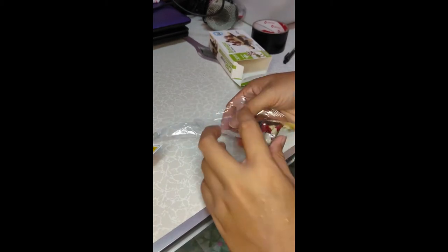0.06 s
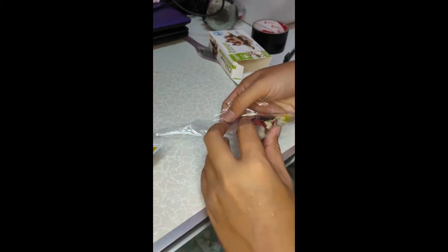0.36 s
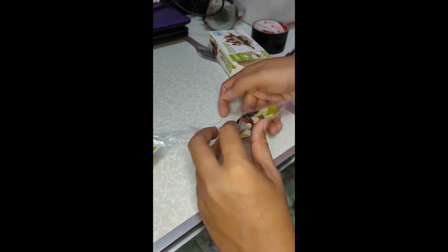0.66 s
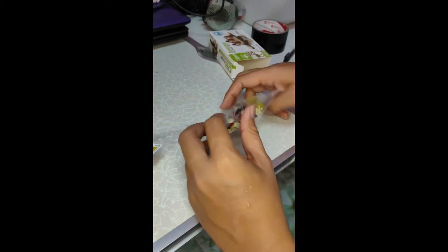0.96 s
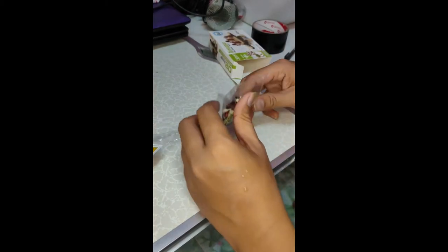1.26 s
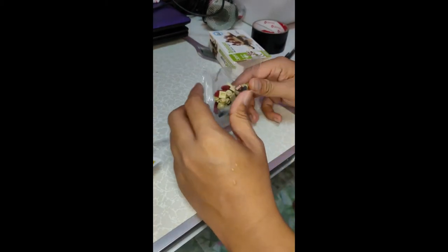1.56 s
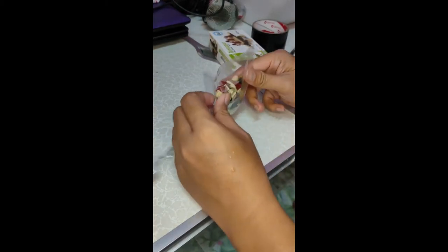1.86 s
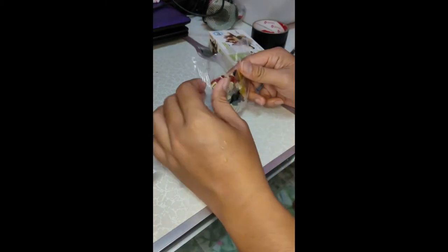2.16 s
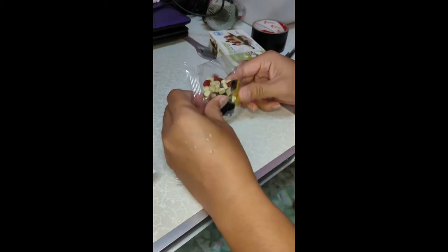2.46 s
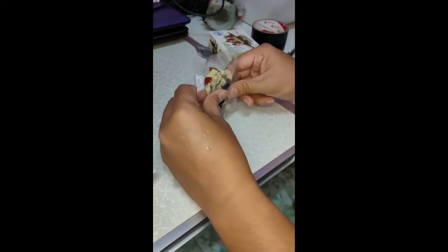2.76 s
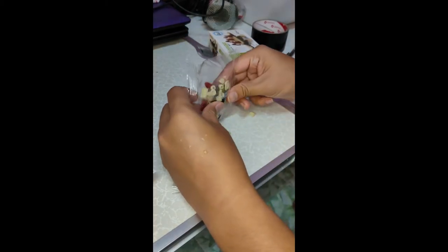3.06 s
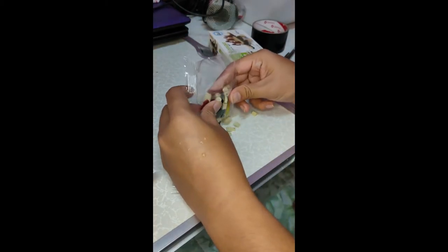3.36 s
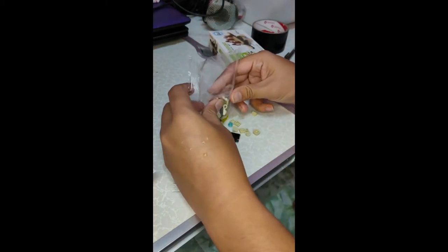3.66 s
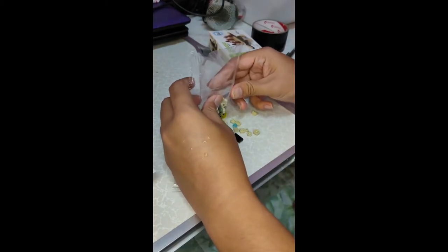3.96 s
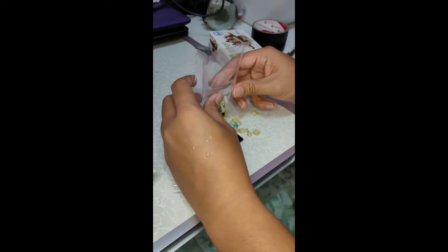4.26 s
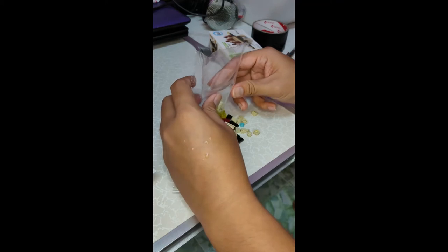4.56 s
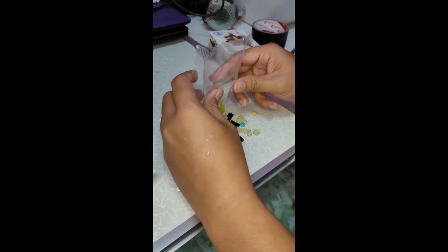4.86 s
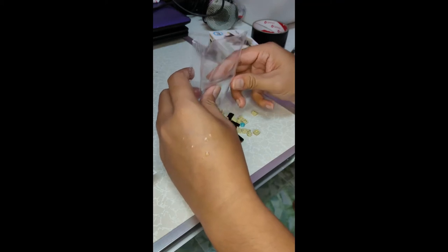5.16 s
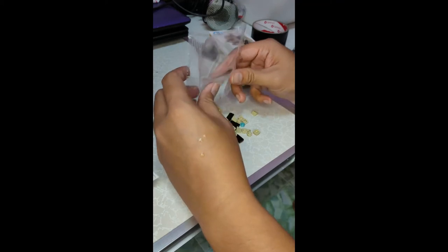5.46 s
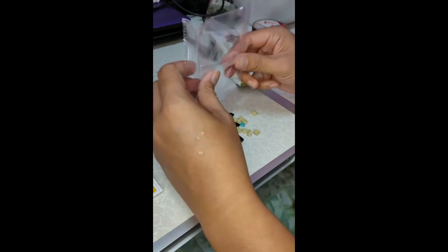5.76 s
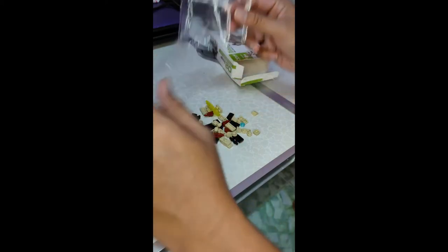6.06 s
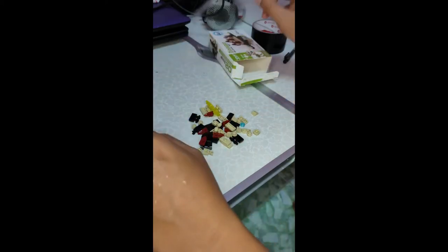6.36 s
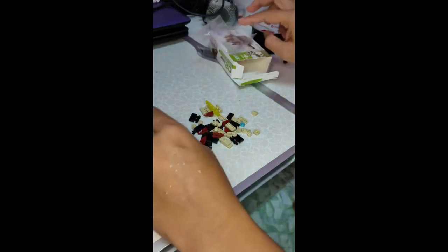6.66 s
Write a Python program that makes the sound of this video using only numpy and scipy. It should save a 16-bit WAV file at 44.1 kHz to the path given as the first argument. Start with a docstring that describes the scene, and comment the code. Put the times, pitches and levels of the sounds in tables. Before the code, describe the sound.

A thin plastic bag is handled close to a phone microphone in a hard-walled room with a short echo. For the first two seconds it crinkles in light spurts, with sharp, bright snaps and faint low nudges on the table. At about 2.3 seconds come a tiny finger squeak and a soft bump, and the shaking starts: louder, denser rustling, with the sharpest cracks around 2.6 and 2.8 seconds. Small plastic toy bricks jostle in the bag and clack against each other and the table until about 4.7 seconds, with a hollow bump near 3.4 and a brief lull just after 4. From 5 to 6 seconds the emptied bag crinkles and snaps more softly. A last crinkle, a click and a hollow table thud land at about 6.5 seconds. A fan hums quietly throughout, its drone sinking after one second and swelling back around 3.5.

```python
"""A thin plastic bag snaps and crinkles close by as hands work it open and shake out small toy bricks.
Creases flip with bright cracks over a rustle of tiny pops; the bricks jostle in the film and clack
against each other and the table. A finger squeaks on the plastic, and the hands bump down.
Behind it all a fan hums in the hard-walled room. A phone hears the scene through two microphone
ports, each ringing near 7 kHz."""
import sys
import numpy as np
from scipy import signal
from scipy.fft import rfft, irfft, next_fast_len
from scipy.io import wavfile
from scipy.ndimage import map_coordinates

SR = 44100
rng = np.random.default_rng(int(sys.argv[2]) if len(sys.argv) > 2 else 0)


def output_pcm(signal):
    """Save a mono or channel-first signal as 16-bit PCM at the path in sys.argv[1].

    Samples are clipped to [-1, 1] before scaling.
    """
    pcm = np.clip(np.atleast_2d(signal).T, -1, 1) * 32767
    wavfile.write(sys.argv[1], SR, np.round(pcm).astype(np.int16))


N = 295470

# The body colour of the bricks. Each row, as in every colour table: frequency in Hz, relative level in dB.
BRICK_COLOUR = [(200, -1.5), (450, 6.5), (1000, 4.5), (2500, 0), (4000, -4.5), (8000, -22.5), (16000, -40)]


def hands(grip_rise_s=0.01, grip_bricks_db=-3, empty_at_s=5):
    """Two level curves in dB: how hard the hands crumple the film and how hard they stir the bricks."""
    # Fingers pinch and pull the film. Each row: start in seconds, length in seconds, level in dB.
    grips = [(-0.02, 0.021, -44), (0.244, .03, -55), (0.281, 0.045, -48), (0.445, 0.059, -46.5),
             (0.666, 0.17, -52.5), (0.866, 0.048, -53.5), (0.91, 0.064, -51), (1.233, 0.065, -50.5),
             (1.666, 0.055, -47.5), (1.782, 0.033, -46.5), (2.1, 0.12, -51.5), (5.076, 0.016, -44.5),
             (5.14, .06, -48.5), (5.21, 0.037, -43), (5.302, 0.08, -52), (5.661, 0.19, -53),
             (5.91, 0.081, -59), (6.432, 0.044, -51), (6.485, 0.02, -46)]
    # The bag is shaken. Each row: start, rise and length in seconds, film level and brick level in dB.
    shakes = [(2.318, 0.021, 0.12, -39, -44), (2.563, 0.053, 0.12, -37, -44),
              (2.737, 0.029, .3, -35, -42.5), (2.99, 0.13, 0.31, -42.5, -47), (3.299, 0.018, 0.1, -37, -48),
              (3.37, 0.071, 0.434, -33.5, -39.5), (3.82, 0.03, 0.22, -38.5, -47),
              (4.06, 0.056, 0.13, -53.5, -63), (4.217, 0.013, 0.074, -40, -45.5),
              (4.248, 0.083, 0.46, -35, -41)]
    film = [(s, grip_rise_s, length, db) for s, length, db in grips]
    bricks = [(s, grip_rise_s, length, db + grip_bricks_db) for s, length, db in grips if s < empty_at_s]
    for s, rise, length, film_db, bricks_db in shakes:
        film.append((s, rise, length, film_db))
        bricks.append((s, rise, length, bricks_db))
    # the bricks settle sooner than the film, and the held bag is never quite still
    return effort(film, sag_db_per_s=25, held_db=-71.5), effort(bricks, sag_db_per_s=45, held_db=-61.5)


def effort(moves, sag_db_per_s, held_db, release_db_per_s=180):
    """The level in dB of a run of hand moves: each rises, slackens while it lasts and is then let go."""
    t = np.arange(0, N / SR, .002)
    power = amp(held_db) ** 2
    for s, rise, length, db in moves:
        sag_db = sag_db_per_s * np.maximum(t - s - rise, 0)
        release_db = release_db_per_s * np.maximum(t - s - length, 0)
        attack = np.clip((t - s) / rise, 0, 1)
        power = power + (attack * amp(db - sag_db - release_db)) ** 2
    return np.interp(np.arange(N) / SR, t, 10 * np.log10(power))


def snaps(work_db, edge_db=6, sheet_db=-14.5, sheet_growth=0.27):
    """Each crease cracks brightly, and the sheet around it gives a duller pop that varies less."""
    # The loudest creases. Each row: start in seconds, level in dB, left minus right in dB.
    accents = [(0.251, -47, -4), (0.3042, -38, -1), (0.4234, -33.5, 4), (0.457, -21, -2),
               (0.6594, -40.5, -11), (0.963, -30.5, -3), (1.0152, -28, -2), (1.2343, -32.5, -2),
               (1.278, -35, 2), (1.3188, -39, -1), (1.4985, -27, -2), (1.7035, -32, -4), (1.8028, -26, -3),
               (1.8145, -32, 0), (1.8272, -29, -8), (1.8493, -21.5, 4), (1.8605, -27, -1),
               (2.0942, -33.5, -3), (2.139, -36.5, -10), (2.1768, -32, -4), (2.387, -23.5, -5),
               (2.474, -27.5, -3), (2.4948, -20.5, -1), (2.5883, -16, 3), (2.7593, -16, -6),
               (3.0812, -24, -2), (3.8472, -26, 3), (4.118, -32.5, 0), (4.638, -26, -4), (5.0833, -36, 0),
               (5.1517, -32, 0), (5.2283, -27.5, 1), (5.4245, -32, -5), (5.5236, -38, -3),
               (5.6815, -28.5, -2), (5.9315, -32.5, -6), (5.9612, -32.5, -1), (5.9925, -34.5, 0),
               (6.1135, -42, -10)]
    # The colours of the crack and of the sheet. Each row: frequency in Hz, level in dB.
    crack_colour = [(200, -20), (1000, -23), (2700, 5), (5000, 0.5), (7200, 4.5), (10000, 3.5),
                    (13000, 5.5), (16000, 0.5)]
    sheet_colour = [(60, 16), (170, 1), (400, -11), (1500, 6.5), (2700, -1.5), (6000, -11.5), (16000, -43)]
    edge, sheet = np.zeros((2, 2, N))
    for s, db, pan_db in list(accents) + stray_creases(work_db):
        sides = amp(np.array([[pan_db], [-pan_db]]) / 2)
        t60 = np.interp(db, [-30, -18], [.003, .0007])  # the harder the flip, the shorter the crack
        add(edge, s, amp(db + edge_db) * sides * crack(t60))
        add(sheet, s + 0.000942, amp(sheet_db + sheet_growth * db) * burst(0.042))
    return coloured(edge, crack_colour) + coloured(sheet, sheet_colour)


def stray_creases(work_db, per_s=14, count=200, base_db=-9.5, growth=0.57):
    """Cues for lesser creases that give way at random, louder when the film is worked harder."""
    times = np.cumsum(rng.exponential(size=count)) / per_s
    creases = []
    for s, (size, side) in zip(times, rng.standard_normal((count, 2))):
        if s * SR < N:
            db = base_db + growth * work_db[int(s * SR)] + 2.5 * size
            pan_db = -1.5 + 4 * side
            creases.append((s, db, pan_db))
    return creases


def crack(t60, size=2048):
    """A crease gives way: a small lead-in, the main crack with a brief flutter, three after-cracks."""
    out = np.zeros((2, size))
    add(out, 0, amp(-13) * burst(.003))
    add(out, .001, burst(t60) + amp(-4) * burst(.02))
    for delay in rng.uniform(.0014, .004, 3):
        add(out, delay, amp(-10) * burst(.002))
    return out


def crinkle(work_db, level_db=-4):
    """Countless small creases pop in clumps: the harder the film is worked, the denser and louder."""
    # Crisp crinkle and duller crinkle. Each row: frequency in Hz, level in dB.
    crisp_colour = [(200, -33), (1000, -6), (3000, 0.5), (5000, -11), (9000, 1), (12000, -2), (16000, 7.5)]
    dull_colour = [(200, -4), (1000, -8), (3000, 0.5), (5000, -4.5), (7000, 0), (9000, 0), (12000, -6),
                   (16000, -4)]
    # How dull the crinkle sounds. Each row: time in seconds, share from 0 to 1.
    dull_share = [(2.3, 0.23), (2.75, 0.63), (3.1, 0.89), (3.9, 0.55), (4.25, 0.77), (4.6, 0.82),
                  (5.3, 0.96), (5.6, 0.46), (6.5, 0.5)]
    pops_per_s = 900 * amp(.7 * (work_db + 45) + 3 * wobble(35))
    pops = grains(pops_per_s, spread_db=4.4, t60=.008) * amp(1.2 * wobble(30))
    dull = np.clip(envelope(dull_share), 0, 1)
    blend = (1 - dull) * coloured(pops, crisp_colour) + dull * coloured(pops, dull_colour)
    return amp(work_db + level_db) * blend


def pings(width_hz=160):
    """A stretched patch of film rings at one pitch when it pops."""
    # Each row: start in seconds, pitch in Hz, level in dB.
    taut_patches = [(.252, 2130, -37.5), (1.805, 2670, -35), (1.828, 2700, -38)]
    out = np.zeros((2, N))
    for s, hz, db in taut_patches:
        add(out, s, amp(db) * ring([(hz, width_hz, 0)]))
    return out


def clacks(tick_db=5, knock_db=16, ring_hz=7200):
    """A brick strikes another or the table: a bright, ringing tick over a duller knock."""
    # Each row: start in seconds, level in dB, extra gain for the knock in dB.
    strikes = [(1.7935, -31, -10), (2.348, -23.5, -12), (2.3601, -21.5, -12), (2.612, -21, -14),
               (2.6559, -20, -14), (2.7502, -21.5, -11.5), (2.8003, -18.5, -34), (2.8206, -19, -12.5),
               (2.8467, -18, -18), (2.9702, -27, -7), (3.1466, -25.5, -21), (3.3122, -20, -12),
               (3.3286, -16.5, -20), (3.375, -21.5, -13), (3.4493, -19, -10), (3.47, -17, -28),
               (3.5105, -24, -14), (3.6737, -21.5, -19), (3.924, -16, -21), (4.233, -32, -1),
               (4.2621, -23.5, -10), (4.6509, -21.5, -9), (6.498, -33.5, 0)]
    # The colour of the contact. Each row: frequency in Hz, level in dB.
    tick_colour = [(200, 0), (1000, 3.5), (3000, 2.5), (5000, -3.5), (9000, -2), (12000, 2), (16000, 1)]
    ticks, knocks = np.zeros((2, 2, N))
    for s, db, extra_db in strikes:
        tick = amp(-9) * burst(.006)  # first graze
        pitch = ring_hz * np.exp(rng.normal(0, .13))
        add(tick, .0015, amp(-16) * ring([(pitch, 280, 0)]))
        add(tick, .0015, burst(.008) + amp(-2) * burst(.035))  # the hit and its settling
        add(tick, rng.uniform(.003, .009), amp(-6) * burst(.004))  # one bounce
        add(ticks, s, amp(db + tick_db) * tick)
        add(knocks, s + 0.000987, amp(db + extra_db + knock_db) * burst(0.014))
    return coloured(ticks, tick_colour) + coloured(knocks, BRICK_COLOUR)


def jostle(shake_db):
    """Loose bricks rub and tick against each other through the film."""
    return amp(shake_db) * coloured(grains(900, spread_db=4.5, t60=0.016), BRICK_COLOUR)


def squeak(slip_hz=490):
    """Skin sticks and slips on the film, faster as it slides; the sheet favours the second harmonic."""
    # Each row: start in seconds, length in seconds, level in dB.
    slides = [(2.33, 0.035, -46)]
    out = np.zeros((2, N))
    for s, length, db in slides:
        size = round(length * SR)
        speed = 1 + .17 * np.linspace(-.5, .5, size) + .03 * wobble(700)[:size]
        phase = 2 * np.pi * np.cumsum(slip_hz * speed) / SR
        grip = amp(3 * wobble(300)[:size])
        harmonics = np.sin(2 * phase) + amp(-7) * np.sin(3 * phase)
        chirp = unit(grip * harmonics * signal.windows.tukey(size))
        add(out, s, amp(db) * np.tile(chirp, (2, 1)))
    return out


def bumps():
    """Hand and bag bump down, and the table top answers with a hollow thud."""
    # Each row: start in seconds, level in dB.
    landings = [(2.362, -32.5), (3.439, -28), (6.513, -26.5)]
    # The table's modes. Each row: frequency in Hz, width in Hz, level in dB.
    table_modes = [(374, 50, -3), (477, 67, -13), (780, 60, -12), (954, 31, -14)]
    out = np.zeros((2, N))
    for s, db in landings:
        add(out, s, amp(db) * ring(table_modes))
    return out


def thumps(level_db=19):
    """Fingertips nudge the table with a soft, low thump."""
    # Each row: start in seconds, level in dB.
    nudges = [(0.448, -50), (0.963, -52), (1.499, -62), (1.804, -62), (3.08, -59), (3.921, -54),
              (4.645, -55), (5.189, -55), (5.677, -53)]
    out = np.zeros((2, N))
    for s, db in nudges:
        add(out, s, amp(db + level_db) * ring([(59.7, 15, -2), (125, 36, 2)]))
    return out


def fan(drone_db=1, air_db=-49.5, alike_hz=520):
    """Motor and blade tones over rushing air, which is alike at both ports only in the bass."""
    # The drone swells and sinks. Each row: time in seconds, level in dB.
    swell = [(0, -49), (.37, -50), (.47, -44), (.59, -53.5), (.76, -44), (1.14, -47), (1.35, -61.5),
             (2.0, -68), (2.7, -60.5), (3.33, -63), (3.42, -52), (3.8, -45), (4.22, -42), (4.42, -50.5),
             (4.62, -46), (4.7, -49.5), (4.79, -44), (5.0, -43.5), (5.35, -46), (6.5, -44.5), (6.7, -54.5)]
    # The drone with its side tones, the steadier motor, the air. Each row: frequency in Hz, level in dB.
    drone_tones = [(308.9, -2.5), (269, -11.5), (327.6, -13)]
    motor_tones = [(247.5, -56), (371, -59.5), (495.5, -65)]
    air_colour = [(30, -7), (150, -5.5), (280, 4.5), (420, 0), (800, 1), (1300, -6.5), (2300, -6.5),
                  (3500, -18.5), (5000, -29), (10000, -28.5), (16000, -28.5)]

    def mid_and_side(hz):
        """The air's colour, opening from mono in the bass to wide in the treble."""
        angle = np.arccos(np.exp(-(hz / alike_hz) ** 2)) / 2
        return amp(along(air_colour, hz)) * [np.cos(angle), np.sin(angle)]

    drone = sum(amp(db) * tone(hz, drift_hz=1, waver_db=.5) for hz, db in drone_tones)
    hum = sum(amp(db) * tone(hz, drift_hz=2.5, waver_db=1.8) for hz, db in motor_tones)
    mid, side = filtered(rng.standard_normal((2, N)), mid_and_side)
    air = unit(np.array([mid + side, mid - side]))
    return amp(envelope(swell) + drone_db) * drone + hum + amp(air_db) * air


def room(x, build_up_s=0.0013):
    """The walls answer with a diffuse tail that builds up briefly and rings longest in the mids."""
    # Each row: frequency in Hz, seconds to fall by 60 dB.
    decay_times = [(250, 0.37), (1000, 0.99), (4000, 0.82), (8000, 0.65), (16000, 0.49)]
    hz, t, noise = signal.stft(rng.standard_normal((2, SR)), SR, nperseg=256)
    decay = amp(-60 * t / along(decay_times, hz)[:, None])
    onset = 1 - np.exp(-t / build_up_s)
    _, tail = signal.istft(noise * decay * onset, SR, nperseg=256)
    return signal.oaconvolve(x, tail / np.linalg.norm(tail[0]), axes=1)[:, :N]


def burst(t60, size=4096):
    """A stereo puff of noise of unit energy that falls 60 dB in t60 seconds."""
    puff = rng.standard_normal((2, size)) * amp(-60 * np.arange(size) / SR / t60)
    return puff / np.linalg.norm(puff, axis=1, keepdims=True)


def grains(per_s, spread_db, t60):
    """Tiny random pops of uneven size, each a puff that dies in t60 seconds; rms 1."""
    fires = rng.random(N) < per_s / SR
    sizes = amp(spread_db * np.minimum(rng.exponential(size=N), 3))
    fade = amp(-60 * np.arange(4096) / SR / t60)
    power = signal.oaconvolve(fires * sizes ** 2 / per_s, fade ** 2)[:N]
    return unit(np.sqrt(np.abs(power)) * rng.standard_normal((2, N)))


def ring(modes, size=6000):
    """Damped modes (Hz, width in Hz, dB), struck a little differently each time; centred, peak 1."""
    t = np.arange(size) / SR
    out = sum(amp(db + rng.normal(0, 0.4)) * np.exp(-np.pi * width * t) * np.sin(2 * np.pi * hz * t)
              for hz, width, db in modes)
    return np.tile(out / np.abs(out).max(), (2, 1))


def tone(hz, drift_hz, waver_db, lag_s=0.00015):
    """A sine that wanders in pitch and strength and reaches the left port slightly late; rms 1."""
    turns = np.cumsum(hz + drift_hz * wobble(7)) / SR - hz * np.array([[lag_s], [0]])
    return unit(np.sin(2 * np.pi * turns) * amp(waver_db * wobble(5.4)))


def amp(db):
    """Decibels to gain."""
    return 10 ** (np.asarray(db) / 20)


def unit(x):
    """x at rms 1."""
    return x / np.sqrt(np.mean(x ** 2) + 1e-20)


def along(points, hz):
    """Read (Hz, value) points along a log frequency axis."""
    freqs, values = np.transpose(points)
    return np.interp(np.log(hz + 1), np.log(freqs + 1), values)


def envelope(points):
    """Join (seconds, value) points into one value per sample."""
    return np.interp(np.arange(N) / SR, *np.transpose(points))


def wobble(rate):
    """A smooth random curve, rate knots a second."""
    return map_coordinates(rng.standard_normal(int(N * rate / SR) + 4), [np.arange(N) * rate / SR])


def filtered(x, response):
    """x shaped by a gain that depends on frequency."""
    size = next_fast_len(N + SR // 2)
    return irfft(rfft(x, size) * response(np.fft.rfftfreq(size, 1 / SR)), size)[..., :N]


def causal(level, size=4096):
    """The minimum-phase impulse response of a dB-of-frequency function."""
    cepstrum = irfft(np.log(amp(level(np.fft.rfftfreq(size, 1 / SR)))))
    fold = 1 + np.sign(np.fft.fftfreq(size))
    return irfft(np.exp(rfft(cepstrum * fold)))


def coloured(x, colour):
    """Stereo x through a causal filter of that colour and unit energy."""
    impulse = causal(lambda hz: along(colour, hz))
    return signal.oaconvolve(x, impulse[None] / np.linalg.norm(impulse), axes=1)[:, :N]


def add(track, s, sound):
    """Mix a stereo sound in at s seconds."""
    part = track[:, max(round(s * SR), 0):][:, :sound.shape[1]]
    part += sound[:, :part.shape[1]]


def scene():
    """Bag and bricks up close, their echo in the room, and a dry bed of fan and low thumps."""
    work_db, shake_db = hands()
    background = fan() + thumps()
    hits = clacks() + bumps() + squeak()
    rustle = crinkle(work_db) + jostle(shake_db)
    film = pings() + snaps(work_db)
    echo = room(amp(-6) * film + amp(-3) * (hits + rustle))
    return film + hits + rustle + echo + background


def record(dry, top_hz=15850):
    """Each port adds its resonance; the phone cuts the bass and everything above its band limit."""
    # The left port, then the right. Each row: resonance in Hz, width in Hz, boost in dB.
    resonances = [(6620, 840, 12), (7320, 1090, 13)]
    # The bass roll-off. Each row: frequency in Hz, gain in dB.
    low_cut = [(30, -34), (190, -24), (225, -23.5), (255, -15.5), (290, 0)]
    ports = [causal(lambda f: along(low_cut, f) + db / (1 + ((f - hz) / width) ** 2))
             for hz, width, db in resonances]
    heard = signal.oaconvolve(dry, np.array(ports), axes=1)[:, :N]
    return filtered(heard, lambda hz: hz < top_hz)


dry = scene()
out = record(dry)
output_pcm(out)
```